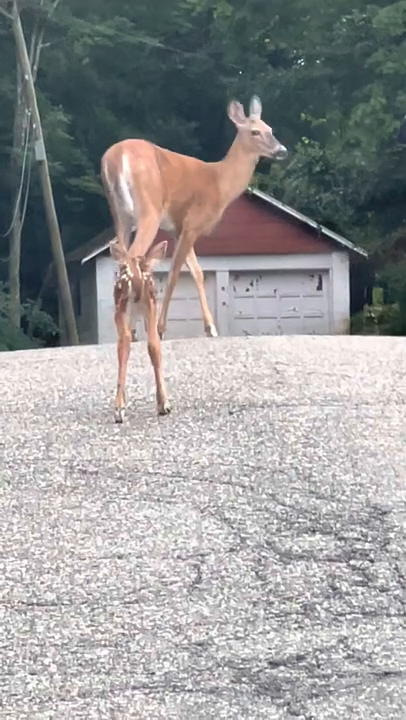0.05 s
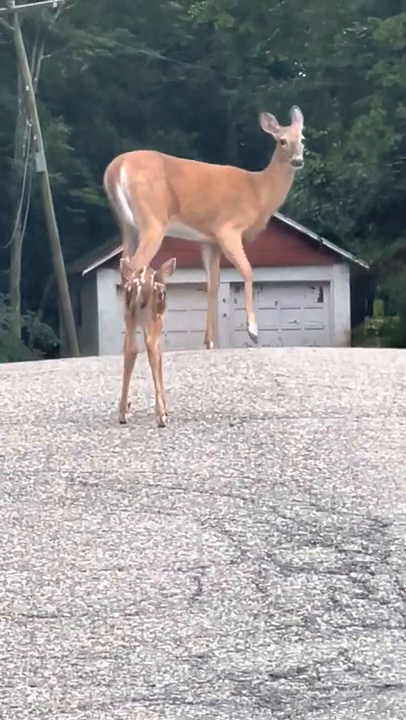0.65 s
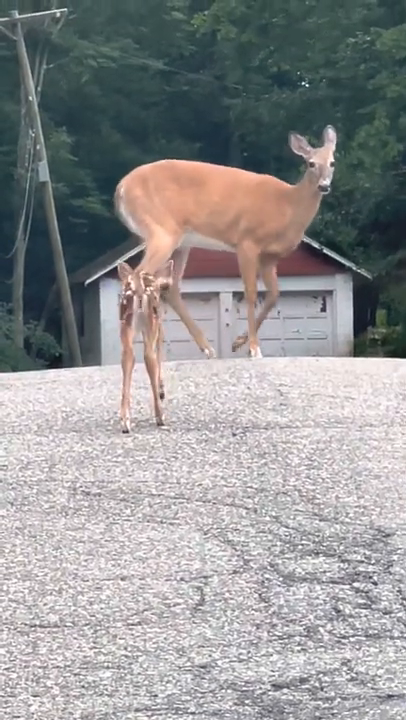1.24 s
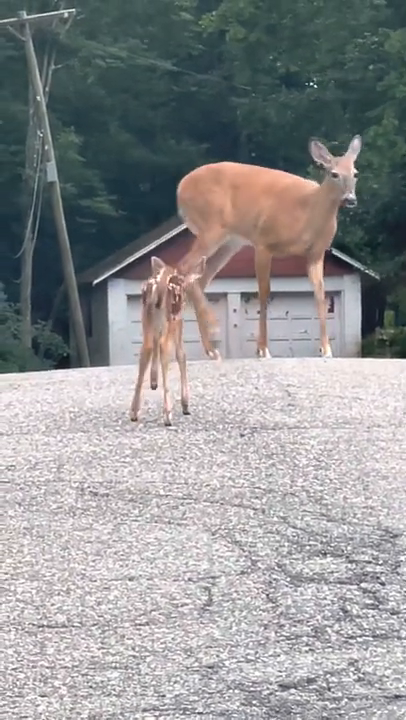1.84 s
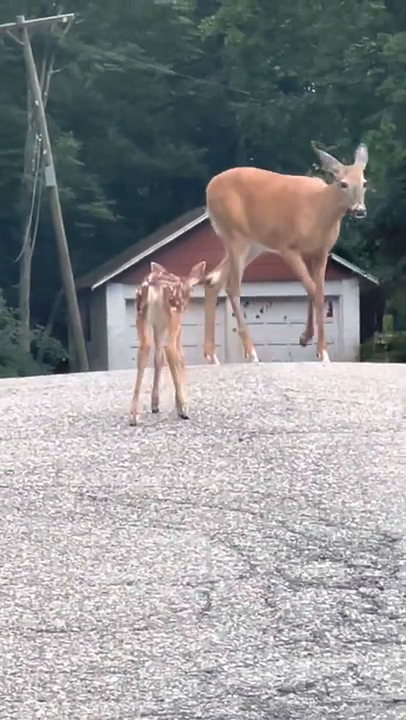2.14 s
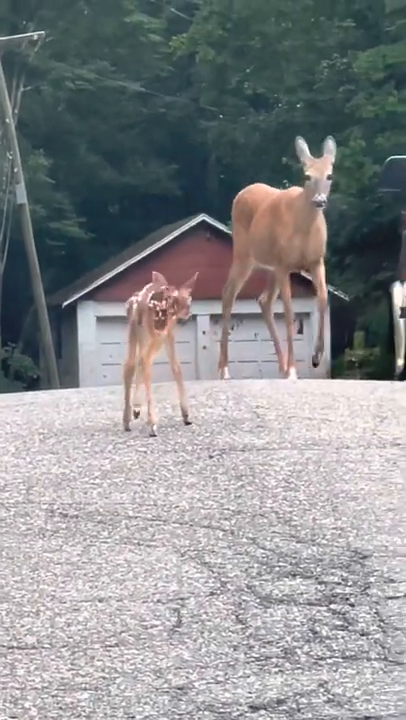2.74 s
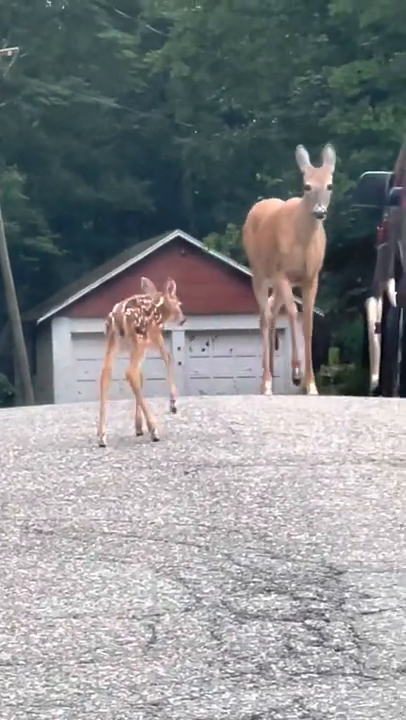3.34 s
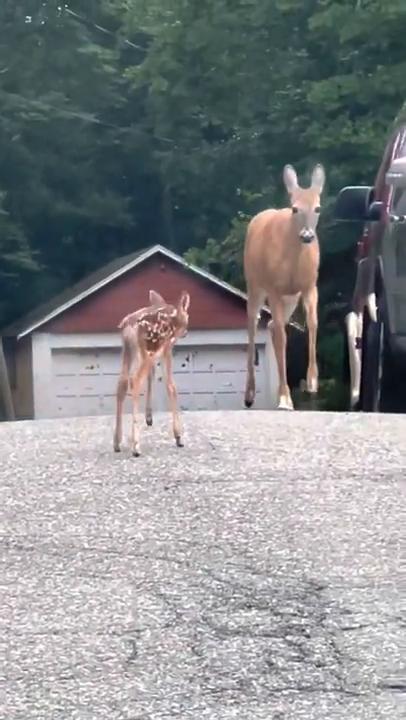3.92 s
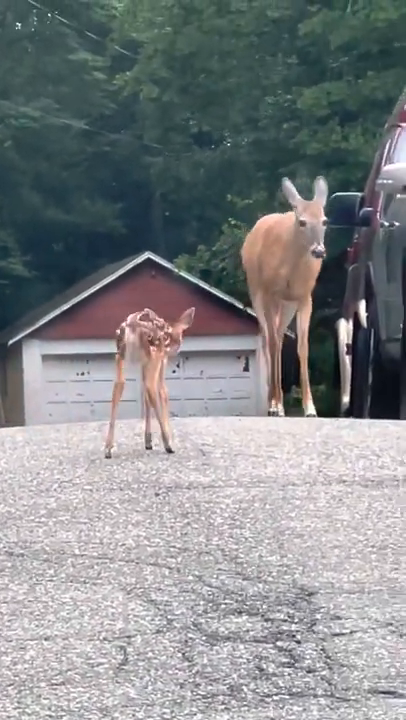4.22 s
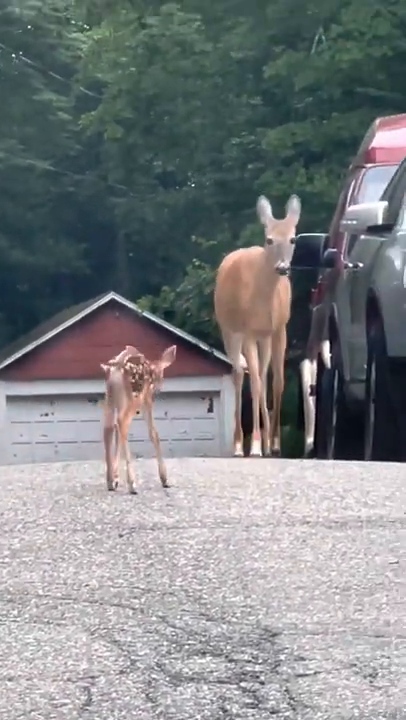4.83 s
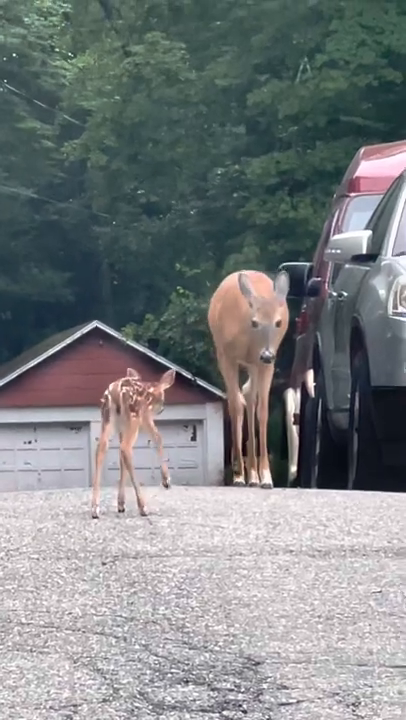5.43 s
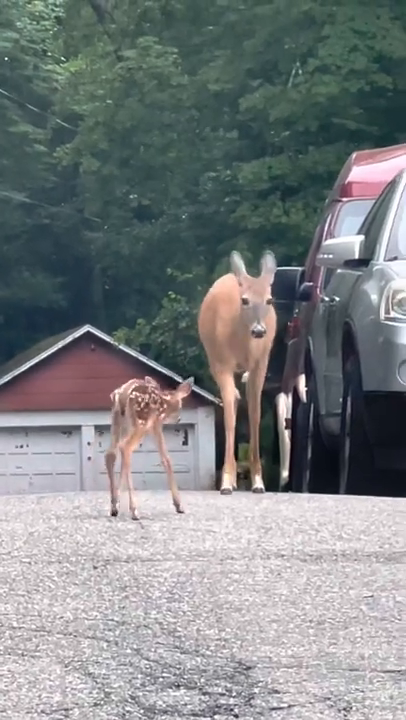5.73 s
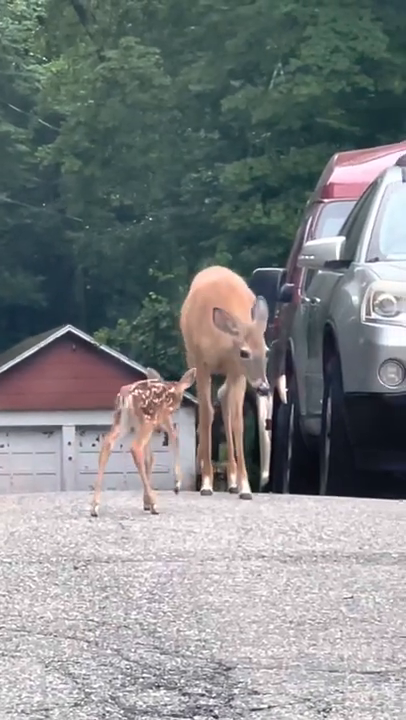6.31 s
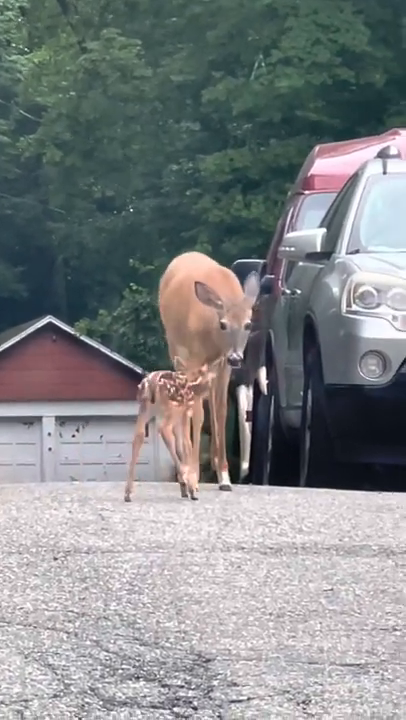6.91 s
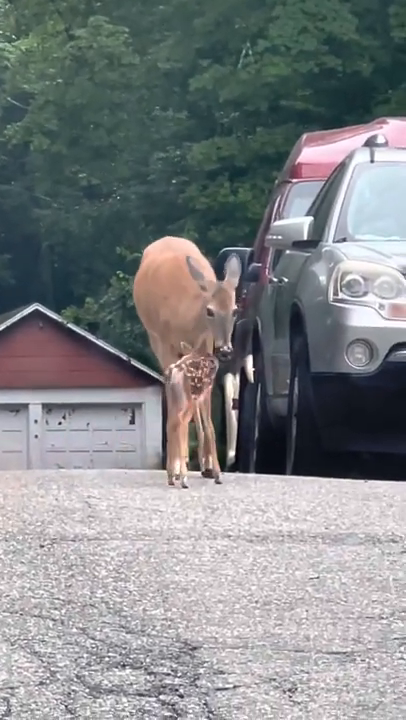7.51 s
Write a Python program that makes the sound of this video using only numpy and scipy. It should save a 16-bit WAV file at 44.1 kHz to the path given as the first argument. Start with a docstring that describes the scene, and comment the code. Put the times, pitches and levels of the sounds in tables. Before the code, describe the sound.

A car engine idles for the whole seven and a half seconds, heard from inside the cabin on a quiet driveway. The main sound is a deep, throbbing rumble with a slight regular shudder of panels and a gentle cabin boom. Its speed wavers only slightly, around 2 to 5 seconds. Above it lie a soft fan rush, thin whines that swell a little toward 3.4 seconds, and a very faint hiss and high trill. Tiny, faint chirps come from outside at about 0.3, 0.6, 1.0, 1.3 and 2.0 seconds. Light, short taps on plastic trim follow close by: one each at 2.3 and 2.6 seconds, three quick ones between 3.3 and 3.5, and a pair near 4.4. All are much quieter than the engine, which then idles on evenly to the end.

```python
"""A V8 car idling on a quiet driveway, heard from inside.
One bank's unevenly spaced exhaust pulses throb through the body; gas noise puffs at each firing,
panels shudder once a cycle and the cabin booms along. Fan and belt drive add a soft rush and thin
whines, under a faint hiss and trill. Small chirps come from outside; light taps ring plastic trim."""
import sys
import numpy as np
from scipy import signal
from scipy.fft import rfft, irfft, next_fast_len
from scipy.io import wavfile

SR = 44100
rng = np.random.default_rng(int(sys.argv[2]) if len(sys.argv) > 2 else 0)


def file_out(sig):
    """Save sig as 16-bit WAV at sys.argv[1]."""
    # one column per channel
    cols = np.atleast_2d(sig).T
    # limit, then scale
    lim = np.clip(cols, -1, 1)
    pcm = np.round(lim * 32767).astype(np.int16)
    wavfile.write(sys.argv[1], SR, pcm)


N = 333396

# idle speed excursions: t/s, change/rpm, hold/s
IDLE_HUNTS = [(-0.238, -4.8, 1.008), (2.115, 14.5, 0.232), (3.876, 19.1, 0.298)]
# exhaust harmonics: multiple of the cycle rate, relative level/dB
EXHAUST_ORDERS = [(5, -39), (8, -20), (9, -24), (10, -23.5), (11, 0), (12, -21.5), (13, -5), (15, -25.5),
                  (16, -14.5), (17, -36), (19, -29), (20, -39), (21, -25.5), (22, -31), (23, -32.5),
                  (24, -25.5), (29, -39), (40, -34), (42, -37), (44, -39), (46, -32.5)]
# rumble of gas and panels: f/Hz, density/(dB/Hz)
RUMBLE_SPECTRUM = [(20, -96.5), (32, -90), (43, -70.5), (68, -71), (86, -71.5), (135, -72), (185, -78),
                   (280, -79), (335, -87.5), (480, -89), (820, -98.5), (1050, -118), (3000, -140)]
# gas noise at each of the eight firings: gain/dB
FIRING_GAINS_DB = [-1.1, 0.9, 0.91, -1.4, -0.17, 0.4, -1.2, -0.6]
# panel shudders: phase/cycles, half length/cycles, f/Hz, lift/dB
PANEL_SHUDDERS = [(0.94, .035, 140, 6.5), (.6, 0.041, 250, 5.5), (.24, .02, 450, 4)]
# cabin resonances: f/Hz, width/Hz, lift/dB
CABIN_MODES = [(232.7, 31, 6.5), (264.3, 6.2, 8.5), (430, 22, 4), (531, 18, 6), (639, 10, 8)]
# left-right likeness of the noise: f/Hz, coherence
EAR_COHERENCE = [(130, 1), (270, 0.95), (570, 0.66), (800, .5), (1100, 0.08), (1550, 0.13), (2200, 1),
                 (3300, 1), (5000, 0.3), (11600, .25)]
# fan air: f/Hz, density/(dB/Hz)
RUSH_SPECTRUM = [(100, -86.5), (450, -88.5), (800, -99), (1000, -109), (1130, -107.5), (1440, -112),
                 (1540, -111), (1690, -115.5), (1880, -114.3), (2150, -123.5), (3500, -135), (6000, -155)]
# fan and pump tones: f/Hz, level/dB
WHINE_TONES = [(355.3, -72), (637, -75.5), (829, -89.5), (868, -87), (1417, -87.5), (1772, -103)]
# swell of the whines: t/s, gain/dB
WHINE_GAIN = [(0, -2.5), (2.1, -1), (3.4, 2), (7.5, .5)]
# faint steady hiss: f/Hz, density/(dB/Hz)
HISS_SPECTRUM = [(1700, -130), (2300, -127), (2700, -121.5), (3100, -124.5), (4000, -125), (9300, -130),
                 (12000, -137)]
# thin high tone pair: f/Hz, level/dB
TRILL_TONES = [(9536, -105), (9664, -106)]
# chirps outside: t/s, level/dB, f/Hz, length/s, fractional pitch fall
CHIRP_NOTES = [(0.329, -77, 2490, 0.016, 0.22), (0.567, -71, 5060, 0.0064, 0.05),
               (1.008, -71.5, 4970, .006, 0.063), (1.308, -85, 3360, 0.011, 0.062),
               (2.026, -78.5, 8750, .004, 0.074)]
# taps on the trim: t/s, level/dB, treble corner/Hz, relative scuff/dB, scuff lead-in/s
TRIM_TAPS = [(2.321, -58.5, 1900, -18, .001), (2.581, -57, 2380, -13.5, .003),
             (3.278, -64, 1400, -11, .003), (3.344, -69, 2200, -17, .001), (3.4775, -57, 2100, -17, .005),
             (4.3374, -58, 3800, -19, .0005), (4.3985, -67, 2300, -13, .001)]
# plastic trim resonances: f/Hz, gain/dB, t60/s
TRIM_MODES = [(720, -1, .009), (1040, -2, 0.009), (1480, 0, 0.011), (1850, -4, 0.011), (2380, -3.5, 0.007),
              (3700, -8, 0.005)]

BANK_SLOTS = (0, 3, 5, 6)  # near bank's firings, of eight per cycle
IDLE_RPM, START_CYCLES = 691.8, .116
PIPE_HZ, PIPE_WIDTH_HZ = 56, 8  # exhaust pipe resonance
EXHAUST_DB, LOSS_DB_PER_RPM = -32, .08  # level falls as speed leaves the pipe resonance


def from_db(db):
    """Decibels to gain."""
    return 10 ** (np.asarray(db) / 20)


def at_hz(points, hz):
    """Interpolate on a log-frequency axis."""
    known_hz, values = np.transpose(points)
    return np.interp(np.log(np.maximum(hz, 1)), np.log(known_hz), values)


def drift(rate_hz):
    """Slow random wander, unit spread."""
    hop = 40
    pole = np.exp(-2 * np.pi * rate_hz * hop / SR)
    white = rng.standard_normal(N // hop + 2002)
    slow = signal.lfilter([1], [1, -2 * pole, pole * pole], white)[2000:]
    return np.interp(np.arange(N) / hop, np.arange(len(slow)), slow / slow.std())


def stereo_noise(spectrum):
    """Noise of given density; coherence between the ears varies with frequency."""
    size = next_fast_len(N)
    hz = np.arange(size // 2 + 1) * SR / size
    coherence = np.sqrt(np.clip(at_hz(EAR_COHERENCE, hz), 0, 1))
    mid, side = rfft(rng.standard_normal((2, size)))
    side *= np.sqrt((1 - coherence) / (1 + coherence))
    gain = from_db(at_hz(spectrum, hz)) * np.sqrt(SR / 2)
    return irfft(np.array([mid + side, mid - side]) * gain, size)[:, :N]


def crank_rpm(stray_s=.506, pull_back_s=.379, settle_s=.281, overshoot=.594):
    """The idle strays, holds, is pulled back too far and settles."""
    t, rpm = np.arange(N) / SR, np.full(N, IDLE_RPM)
    for start_s, change_rpm, hold_s in IDLE_HUNTS:
        corners_s = start_s + np.cumsum([0, stray_s, hold_s, pull_back_s, settle_s])
        rpm += change_rpm * np.interp(t, corners_s, [0, 1, 1, -overshoot, 0])
    return rpm


def exhaust(cycles, flutter_db=.08, roughness=.0083):
    """One bank fires at uneven gaps, so orders 11 and 13 beat twice a cycle."""
    out, cycle_hz = np.zeros(N), np.mean(np.diff(cycles)) * SR
    for order, level_db in EXHAUST_ORDERS:
        bank_rad = np.angle(np.sum(np.exp(-2j * np.pi * order * np.array(BANK_SLOTS) / 8)))
        pipe_lag_rad = np.arctan(2 * (order * cycle_hz - PIPE_HZ) / PIPE_WIDTH_HZ)
        waver = 1 + roughness * order * drift(5.6)  # uneven burning shakes high orders most
        out -= from_db(level_db) * waver * np.cos(2 * np.pi * order * cycles + bank_rad - pipe_lag_rad)
    return np.sqrt(2) * out * from_db(flutter_db * drift(7.7))


def gas_rumble(cycles, puff_depth=.18):
    """Gas noise swells at each firing, each cylinder at its own strength."""
    firings = 8 * cycles
    strength_db = np.interp(firings, np.arange(8), FIRING_GAINS_DB, period=8)
    puffs = 1 + puff_depth * np.cos(2 * np.pi * firings)
    return stereo_noise(RUMBLE_SPECTRUM) * from_db(strength_db) * puffs


def panel_shudder(gas, cycles):
    """Each panel lifts its own band of the rumble once a cycle."""
    out = gas.copy()
    for at_cycles, half_cycles, hz, lift_db in PANEL_SHUDDERS:
        octave = signal.butter(2, [hz / 2 ** .5, hz * 2 ** .5], "band", fs=SR, output="sos")
        offset_cycles = (cycles - at_cycles + .5) % 1 - .5
        swell = np.exp(-(offset_cycles / half_cycles) ** 2)
        out += (from_db(lift_db) - 1) * swell * signal.sosfiltfilt(octave, gas)
    return out


def cabin_boom(engine):
    """Standing waves lift the engine sound near their frequencies."""
    out = engine.copy()
    for hz, width_hz, lift_db in CABIN_MODES:
        pole = np.exp(-np.pi * width_hz / SR)
        feedback = [1, -2 * pole * np.cos(2 * np.pi * hz / SR), pole * pole]
        boom = signal.lfilter([1, 0, -1], feedback, engine) * (1 - pole * pole) / 2
        out += (from_db(lift_db) - 1) * boom
    return out


def fan_rush(flicker_db=1.1):
    """Fan air noise, flickering in level."""
    return stereo_noise(RUSH_SPECTRUM) * from_db(flicker_db * drift(26))


def whines(wander_hz=1.5, flutter_db=2.5):
    """Fan and pump tones waver in pitch and level and swell slightly."""
    out = np.zeros(N)
    swell_db = np.interp(np.arange(N) / SR, *np.transpose(WHINE_GAIN))
    for hz, level_db in WHINE_TONES:
        turns = np.cumsum(hz + wander_hz * drift(3)) / SR
        out += from_db(level_db + flutter_db * drift(9)) * np.sin(2 * np.pi * turns)
    return np.sqrt(2) * from_db(swell_db) * out


def trill(cycles, depth=.6):
    """Two high tones swell twice per engine cycle."""
    t = np.arange(N) / SR
    throb = 1 + depth * np.cos(4 * np.pi * (cycles - .44))
    tones = sum(from_db(level_db) * np.sin(2 * np.pi * hz * t) for hz, level_db in TRILL_TONES)
    return np.sqrt(2) * throb * tones


def chirps(spacing_s=.008, fade_db=8.5, count=4, roughness=.02, trembles_per_s=700):
    """Short, rough falling notes, each with fainter repeats."""
    out = np.zeros(N)
    for start_s, level_db, hz, length_s, fall in CHIRP_NOTES:
        progress = np.linspace(0, 1, int(length_s * SR))
        for k in range(count):
            tremble = np.interp(progress * length_s * trembles_per_s, range(32), rng.standard_normal(32))
            turns = np.cumsum(hz * (1 - fall * (progress - .5) + roughness * tremble)) / SR
            envelope = from_db(level_db - fade_db * np.sqrt(k)) * np.sin(np.pi * progress)
            at = int((start_s + k * spacing_s) * SR)
            out[at:at + len(progress)] += envelope * np.sin(2 * np.pi * turns)
    return out


def reflections(direct, t60_s, wet_db=-6):
    """Direct sound plus a short diffuse tail per ear."""
    t = np.arange(SR // 4) / SR
    tail = rng.standard_normal((2, len(t))) * 1000 ** (-t / t60_s)
    tail /= np.sqrt(np.sum(tail ** 2, axis=1, keepdims=True))
    return direct + from_db(wet_db) * signal.fftconvolve(direct[None], tail, axes=1)[:, :N]


def ring(force, hz, t60_s):
    """Damped mode: a unit impulse starts a unit sine."""
    pole, step_rad = 1000 ** (-1 / (t60_s * SR)), 2 * np.pi * hz / SR
    feedback = [1, -2 * pole * np.cos(step_rad), pole * pole]
    return signal.lfilter([0, np.sin(step_rad)], feedback, force + 1e-18)


def taps(scuff_s=.03, slips_per_s=1300):
    """Each tap brushes the trim, rings it with its own brightness and slides on in tiny slips."""
    out, lead_samples = np.zeros(N), SR // 40
    t = (np.arange(SR // 7) - lead_samples) / SR
    for hit_s, level_db, corner_hz, scuff_db, lead_s in TRIM_TAPS:
        contact = np.exp(-np.abs(t) / np.where(t < 0, lead_s, scuff_s))
        slips = (rng.random(len(t)) < slips_per_s / SR) * from_db(scuff_db) * contact
        at = int(hit_s * SR) - lead_samples
        for k, (hz, mode_db, t60_s) in enumerate(TRIM_MODES):
            force = slips * rng.standard_normal(len(t))
            force[lead_samples] = 1  # the strike
            gain = from_db(level_db + mode_db) / (1 + (hz / corner_hz) ** 4)
            out[at:at + len(t)] += (-1) ** k * gain * ring(force, hz, t60_s)
    return out


def scene():
    """Crank speed sets exhaust pitch and level and the rumble's beat; small sounds lie on top."""
    rpm = crank_rpm()
    cycles = START_CYCLES + np.cumsum(rpm / 60 / 2) / SR  # four-stroke: two turns a cycle
    exhaust_db = EXHAUST_DB - LOSS_DB_PER_RPM * (rpm - IDLE_RPM)
    engine = from_db(exhaust_db) * exhaust(cycles) + panel_shudder(gas_rumble(cycles), cycles)
    fan = fan_rush() + whines()
    touches = reflections(taps(), t60_s=.098)
    outside = reflections(chirps(), t60_s=.085)
    return cabin_boom(engine) + fan + stereo_noise(HISS_SPECTRUM) + trill(cycles) + outside + touches


def record(dry):
    """Short fades at both ends, then a steep low-pass."""
    start_s, fade_s, cutoff_hz = .036, .004, 12250
    t = np.arange(N) / SR
    gate = np.clip(np.minimum(t - start_s, t[-1] - t) / fade_s, 0, 1)
    return signal.sosfiltfilt(signal.butter(12, cutoff_hz, fs=SR, output="sos"), dry * gate)


dry = scene()
out = record(dry)
file_out(out)
```